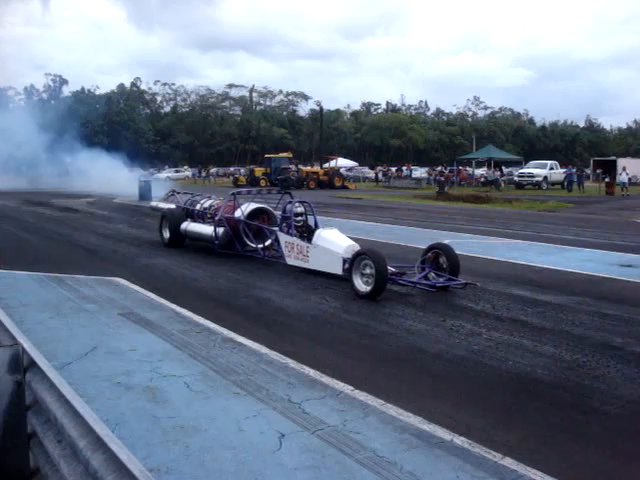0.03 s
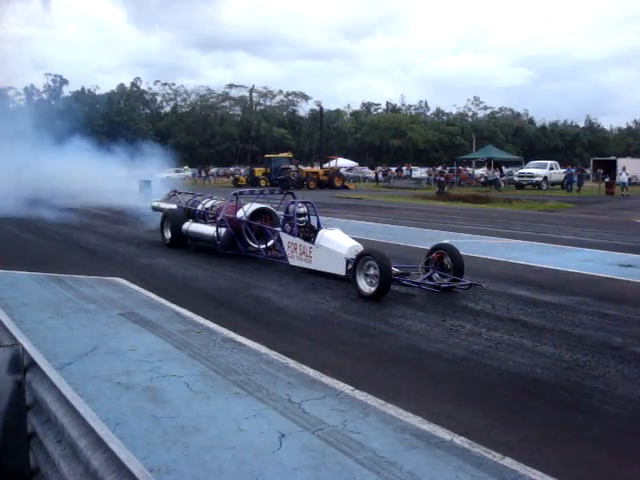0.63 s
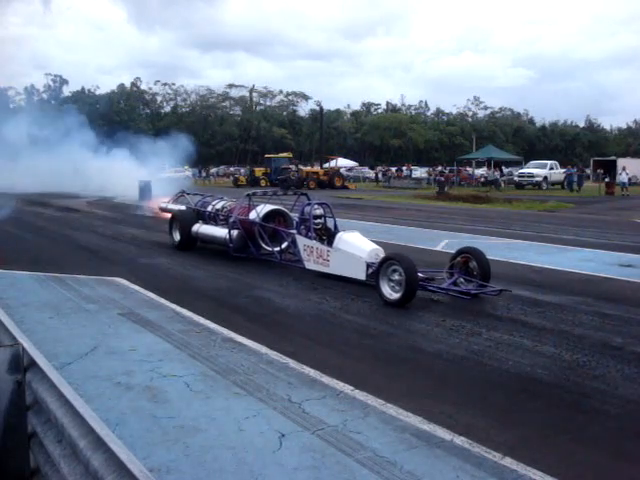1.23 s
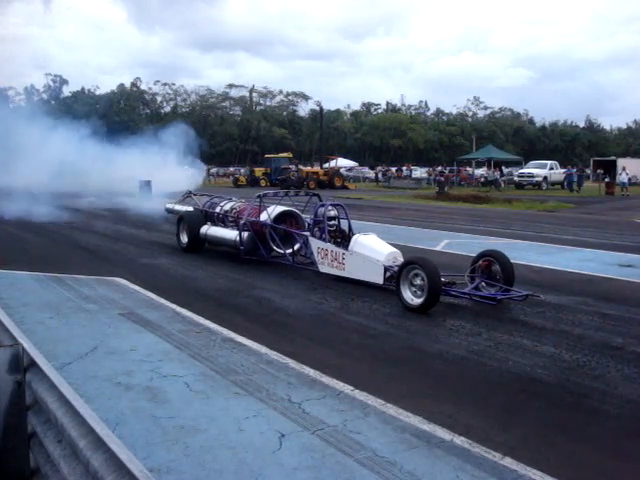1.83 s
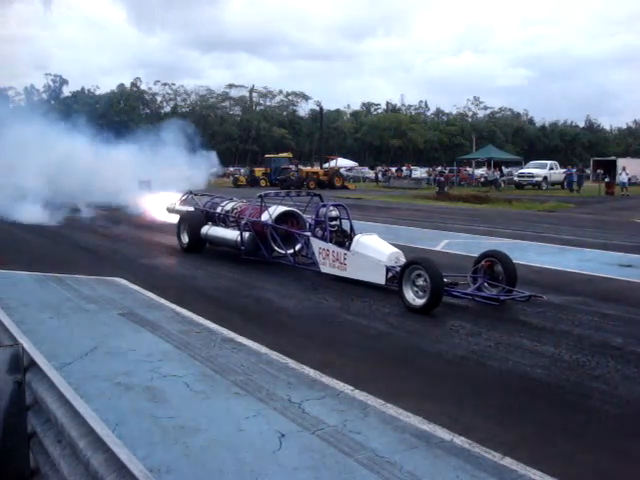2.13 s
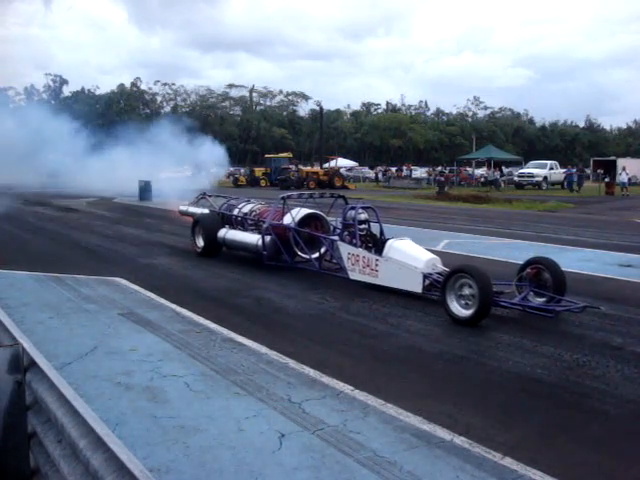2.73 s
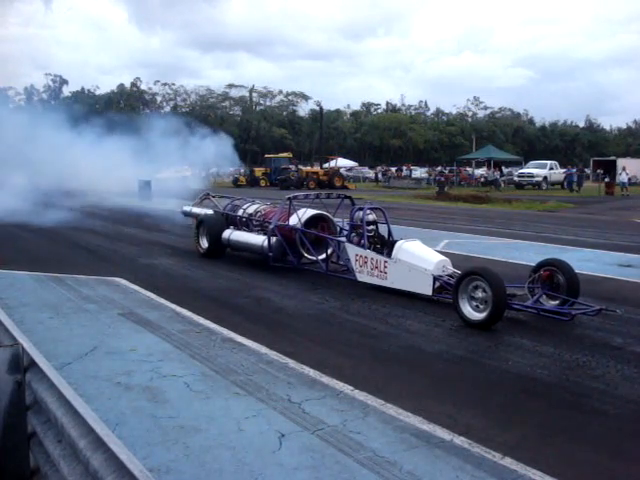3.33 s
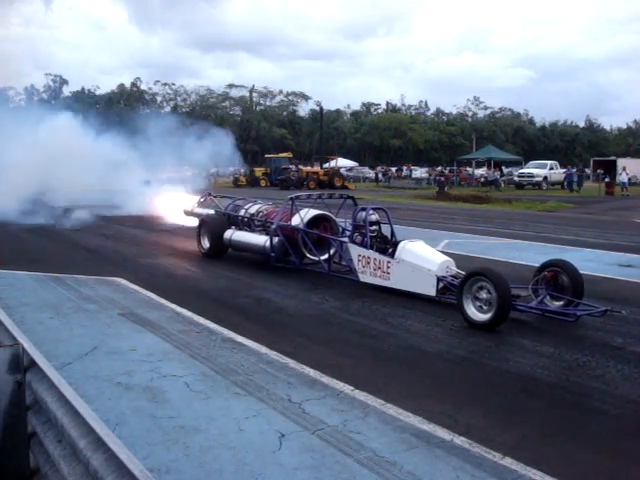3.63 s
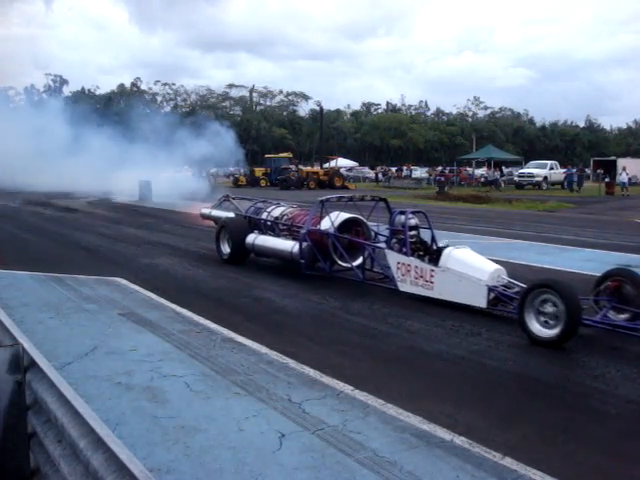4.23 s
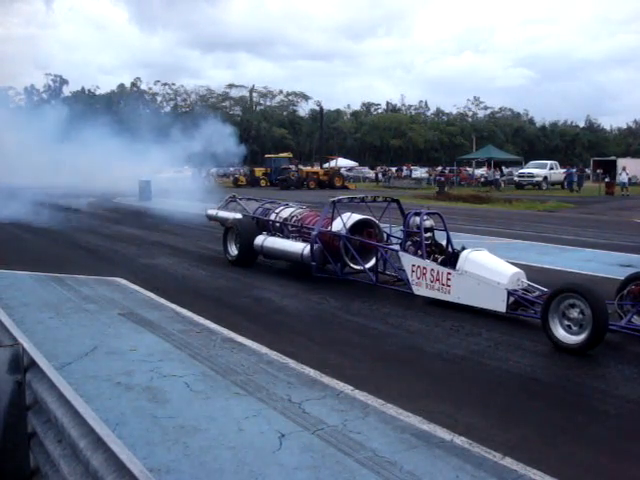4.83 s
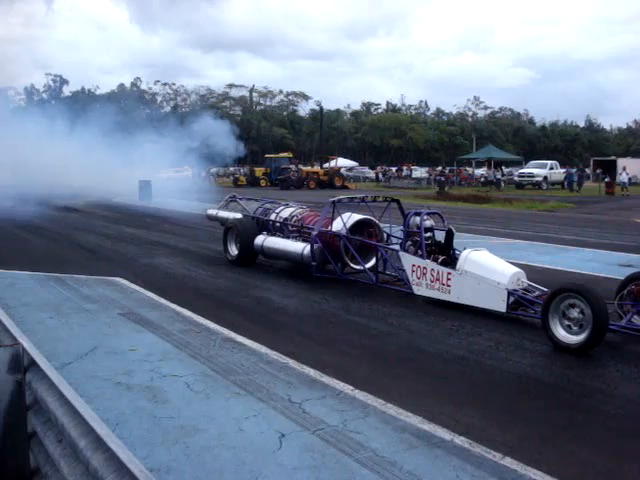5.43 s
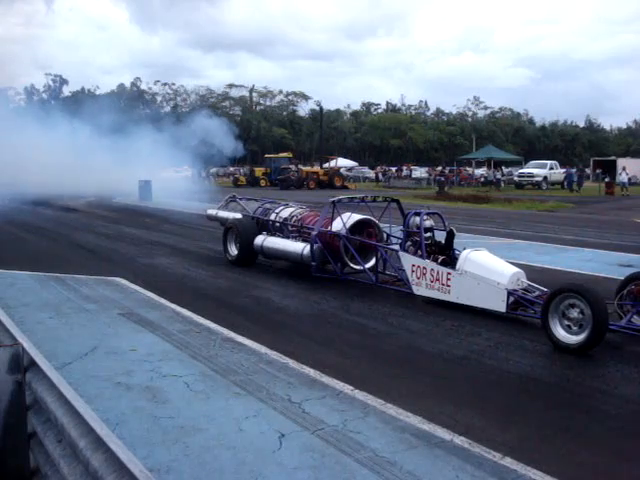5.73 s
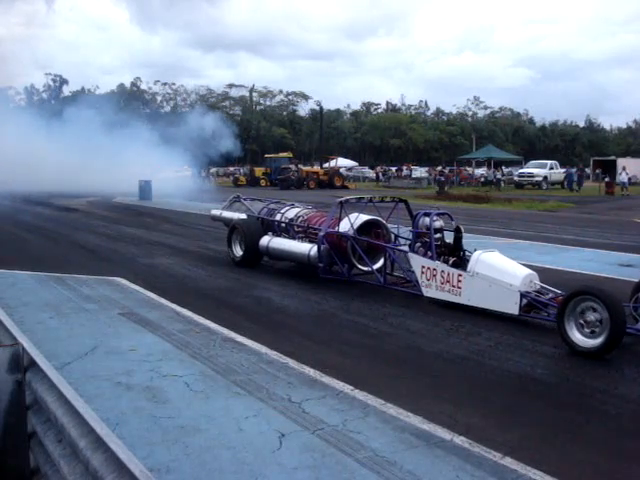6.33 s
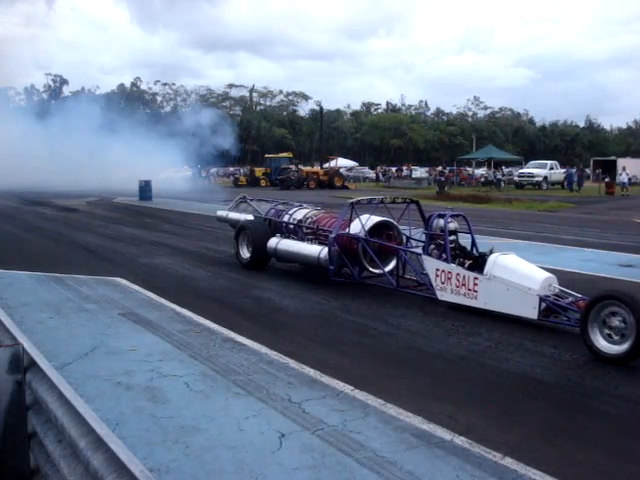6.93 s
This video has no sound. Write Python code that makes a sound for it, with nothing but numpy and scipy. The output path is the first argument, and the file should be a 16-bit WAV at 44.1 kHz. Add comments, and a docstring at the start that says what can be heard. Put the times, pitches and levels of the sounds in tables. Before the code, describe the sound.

High jet engine whine and rushing air from a dragster, dipping in pitch with three sudden, rasping flame bursts before holding steady.

```python
"""A jet dragster creeps up to the start line, heard outdoors through one microphone beside the track.
We come in on the end of a burst of flame, the compressor whining over the rush of intake and exhaust.
Three more times fuel is lit in the tailpipe: a low roar bursts out, the shaft sags, and deep in the sag
the air breaks away from the blades, turning the whine to a harsh rasp. During the last burst the intake
comes round to face the microphone. The whine steadies, then climbs from 6.4 s as the throttle opens."""
import sys
import numpy as np
from scipy import signal
from scipy.fft import rfft, irfft, next_fast_len
from scipy.io import wavfile
from scipy.ndimage import uniform_filter1d, map_coordinates

SR = 44100
rng = np.random.default_rng(int(sys.argv[2]) if len(sys.argv) > 2 else 0)


def generate_wav(signal):
    """Clip the signal to [-1, 1] and save it as 16-bit WAV at the path in sys.argv[1]."""
    frames = np.transpose(np.atleast_2d(signal))
    scaled = np.clip(frames, -1, 1) * 32767
    pcm = np.round(scaled).astype(np.int16)
    wavfile.write(sys.argv[1], SR, pcm)


N = 317079

STAGE_BLADES = (17, 20)  # blades of the two compressor stages
OVERTONE_ORDERS = (34, 37, 51)  # first stage doubled, sum of both stages, first stage tripled
SIDE_FADING, AHEAD_FADING = 0.21, 0.32  # scattered share of an overtone, beating with the direct sound
# how far the intake faces the microphone, 0 side-on to 1 head-on: time_s, share
INTAKE_FACING = [(0, 0.01), (3.7, 0.04), (4.8, 0.84), (7.19, 1)]
# the weaker shaft tones: cycles_per_turn
WEAK_ORDERS = (9, 11, 14, 19, 21, 23, 25, 31, 33, 35, 36, 38, 40, 42, 45, 49)
# each of them from beside the car and from ahead of it: side_db, ahead_db
WEAK_LEVELS = [(-44, -40), (-43.5, -48), (-48.5, -41), (-42, -48.5), (-46, -49.5), (-37, -43.5),
               (-44.5, -37), (-43.5, -47), (-48, -52.5), (-47.5, -48), (-45, -61), (-55.5, -57.5),
               (-42.5, -37), (-67, -50.5), (-56.5, -50), (-59.5, -47.5)]

def compressor_whine(flutter_db, jitter_rad, stall_jitter_rad, weak_flutter_db, weak_stall_db):
    """Blade tones locked to the shaft flutter in level and phase in moving air; weaker ones drift."""
    facing = np.clip(curves(INTAKE_FACING)[0], 0, 1)
    stalled = sum(burst(start, end, attack_s=0.04, t60_s=0.055) for start, end, *_ in BLADE_STALLS)
    wander_hz = 0.07 * wobble(3)  # the shaft is never quite steady
    angle = shaft_angle() + phase_of(wander_hz)
    overtone_fading = SIDE_FADING + facing * (AHEAD_FADING - SIDE_FADING)
    fadings = [0, 0.18] + [overtone_fading] * len(OVERTONE_ORDERS)  # the two stages come first
    tones = np.zeros(N)
    for order, db, fading in zip(STAGE_BLADES + OVERTONE_ORDERS, blade_levels(facing, stalled), fadings):
        scatter = order / STAGE_BLADES[0]  # shorter waves are scattered more
        shake = jitter_rad * wobble(45) + stall_jitter_rad * stalled * wobble(110)
        phase = order * angle + scatter * shake + rng.uniform(0, 2 * np.pi)
        gain = amp(db + flutter_db * scatter * wobble(24))
        tones += gain * (np.sin(phase) + fading * noise_band(phase, width_hz=4.5))
    for order, (side_db, ahead_db) in zip(WEAK_ORDERS, WEAK_LEVELS):
        db = side_db + facing * (ahead_db - side_db)
        db += weak_flutter_db * wobble(9) - weak_stall_db * stalled
        tones += amp(db) * np.sin(order * angle + rng.uniform(0, 2 * np.pi))
    return np.sqrt(2) * tones


# the first stage's tone as the car rolls by the microphone: time_s, level_db
FIRST_STAGE_LEVEL = [(0, -16.5), (.3, -17.5), (.55, -21.5), (.85, -23.5), (1.05, -17.5), (1.75, -21),
                     (2.13, -16.5), (2.35, -20), (3.1, -17.5), (3.9, -18), (4.6, -16.5), (5.7, -15),
                     (6.35, -17), (6.72, -18.5), (7.03, -16.5), (7.19, -23)]
# the second stage's tone: time_s, level_db
SECOND_STAGE_LEVEL = [(0, -31), (.6, -36.5), (1.7, -31.5), (2.05, -30), (3.05, -27.5), (3.2, -24),
                      (3.6, -25), (4.7, -27), (5, -37.5), (5.6, -30), (6.45, -28), (6.72, -38),
                      (6.9, -29.5)]
# the first stage's octave: time_s, level_db
OCTAVE_LEVEL = [(0, -38), (.45, -24), (.85, -29), (1.9, -24), (2.4, -23), (2.95, -33), (3.25, -24),
                (4.5, -34.5), (4.95, -30.5), (5.8, -39), (6.3, -31.5), (7.19, -32.5)]
# the sum tone and the tripled tone: side_db, ahead_db, sag_loss_db, stall_loss_db, run_up_gain_db
HIGH_TONES = [(-27, -42, 0, 24, 15), (-42.5, -36.8, -2, 14, 2.5)]

def blade_levels(facing, stalled, gain_duck_db=3.5, stage_stall_db=2.5, octave_stall_db=13):
    """Levels in dB of the five main whine tones, which all sink in a stall."""
    # the lower three duck during each loud burst, as if the recorder's automatic gain turned them down
    loud = sum(burst(start, cut, attack_s=0.012, t60_s=0.45) for start, cut, *_ in BURNS)
    duck_db = gain_duck_db * loud
    load, rising = sag(), run_up()
    stages = [curves(level)[0] - duck_db - stage_stall_db * stalled
              for level in (FIRST_STAGE_LEVEL, SECOND_STAGE_LEVEL)]
    octave = curves(OCTAVE_LEVEL)[0] - duck_db - octave_stall_db * stalled
    higher = [side_db + facing * (ahead_db - side_db)
              - sag_db * load - stall_db * stalled + run_up_db * rising
              for side_db, ahead_db, sag_db, stall_db, run_up_db in HIGH_TONES]
    return stages + [octave] + higher


CRUISE_HZ, SAG_HZ, SPOOL_UP_S = 186.5, 7.47, 0.44  # shaft speed, drop under a flame, recovery after it
SAG_SKEW, SAG_ROUNDING = 0.64, 1.64  # a sag falls fast and climbs back slowly
RUN_UP_S, RUN_UP_HZ_PER_S2 = 6.417, 7.6

def shaft_speed():
    """Turns a second: every flame drags the shaft down in the same arch; at the end the throttle opens."""
    t = clock()
    hz = CRUISE_HZ + RUN_UP_HZ_PER_S2 * np.maximum(t - RUN_UP_S, 0) ** 2
    for start, cut, *_ in BURNS:
        progress = np.clip((t - start) / (cut + SPOOL_UP_S - start), 0, 1)
        hz -= SAG_HZ * np.abs(np.sin(np.pi * progress ** SAG_SKEW)) ** SAG_ROUNDING
    return hz


def shaft_angle():
    """How far the rotor has turned, in radians."""
    return phase_of(shaft_speed())


def sag():
    """How far the shaft is dragged down: 0 at cruise, 1 at the bottom."""
    return np.maximum(CRUISE_HZ - shaft_speed(), 0) / SAG_HZ


def run_up(full_swell_hz=2.66):
    """The closing swell: 0 at cruise, 1 once the shaft has gained full_swell_hz."""
    return np.clip((shaft_speed() - CRUISE_HZ) / full_swell_hz, 0, 1) ** 2


ROAR_HOLD_S, DEEP_HOLD_S = 0.24, 0.18  # a flame keeps its full size this long
FIREBALL_DB, PIPE_RING_DB = -12.5, 2.5  # fireball against the roar, pipe ring against the hum
HUM_HZ, HUM_COLD_DROP_HZ, PIPE_WARM_S = 156.3, 17, 0.14  # the pipe sings flat until the gas is hot
# fuel burning in the tailpipe: start_s, fuel_cut_s, roar_db, hum_db, thump_db
BURNS = [(-.5, 0.108, -24.8, -40.5, -47), (0.887, 1.5, -24.5, -40.5, -47),
         (2.181, 2.853, -25.5, -40.5, -44.5), (3.651, 4.361, -25, -43, -47)]
# spectrum of the flame's roar: frequency_hz, relative_db
ROAR_SPECTRUM = [(40, -40), (100, -32), (200, -16.5), (330, -3), (500, 2.5), (750, 1), (1100, -1),
                 (1800, -7.5), (3000, -7.5), (8000, -18.5)]
# spectrum of the deep fireball: frequency_hz, relative_db
FIREBALL_SPECTRUM = [(30, -23.5), (95, -23.5), (140, -8), (220, 1), (330, 2), (600, -6), (2000, -31)]
# spectrum of the ignition thump: frequency_hz, relative_db
THUMP_SPECTRUM = [(25, -20), (90, -3), (220, 4), (600, -14), (2000, -40)]
# higher resonances of the tailpipe: pitch_hz, width_hz, relative_db
PIPE_MODES = [(244, 11, -5), (299, 16, 2.5)]

def tailpipe_flames(roar_fade_db_per_s, deep_fade_db_per_s, hum_fade_db_per_s):
    """Fuel catches with a thump and sets the pipe humming; the shrinking flame's deep part fades first."""
    roar, fireball, ring, hum, thump = np.zeros((5, N))
    for start, cut, roar_db, hum_db, thump_db in BURNS:
        age = np.maximum(clock() - start, 0)
        burning = burst(start, cut, attack_s=0.0047, t60_s=1.0)
        deep = burning * amp(-deep_fade_db_per_s * np.maximum(age - DEEP_HOLD_S, 0))
        roar += burning * amp(roar_db - roar_fade_db_per_s * np.maximum(age - ROAR_HOLD_S, 0))
        fireball += deep * amp(roar_db + FIREBALL_DB)
        singing = deep * amp(hum_db - hum_fade_db_per_s * age)
        ring += singing * amp(PIPE_RING_DB)
        pitch_hz = HUM_HZ - HUM_COLD_DROP_HZ * np.exp(-age / PIPE_WARM_S) + 3.5 * wobble(22)
        hum += singing * amp(1.6 * wobble(20)) * np.sin(phase_of(pitch_hz))
        thump += amp(thump_db) * burst(start - 0.006, start + 0.014, attack_s=0.004, t60_s=0.2)
    pipe = lambda f: sum(amp(db) / (1 + ((f - hz) / width) ** 2) for hz, width, db in PIPE_MODES)
    # fill each envelope with its own noise
    roar *= amp(0.8 * wobble(30)) * turbulence(ROAR_SPECTRUM, patchy_db=0.75)
    fireball *= turbulence(FIREBALL_SPECTRUM, patchy_db=1.5)
    ring *= unit(filtered(rng.standard_normal(N), pipe))
    thump *= turbulence(THUMP_SPECTRUM, patchy_db=3.0)
    return roar + fireball + hum + ring + thump


# air breaking away from the blades: start_s, end_s, final_rasp_db, shriek_db, howl_hz, howl_db
BLADE_STALLS = [(-.3, 0.15, -21.5, -29, 2040, -35), (1.103, 1.573, -21, -27, 1750, -36),
                (2.385, 2.884, -19.5, -28.5, 1898, -32), (3.85, 4.435, -20.5, -29, 1636, -30)]
# blade tones smeared by stalled air: cycles_per_turn, width_hz, relative_db
SHRIEK_BANDS = [(16.52, 30, -4), (17.04, 43, -3.5), (33.8, 81, 0.5), (37.2, 45, -4.5)]
# spectrum of the rasp: frequency_hz, relative_db
RASP_SPECTRUM = [(50, -42), (350, -19.5), (600, -7.5), (1150, -6), (1700, -1.5), (2300, -7.5), (2800, -1.5),
                 (3050, -2.5), (3400, 1.5), (4300, -2.5), (5500, -8), (6080, -4), (6900, -11),
                 (9500, -15.5)]

def compressor_stalls(rasp_growth_db):
    """Separated flow shrieks with the shaft, howls, and rasps ever harder until the air grips again."""
    angle = shaft_angle()
    shriek = sum(amp(db) * noise_band(order * angle, width) for order, width, db in SHRIEK_BANDS)
    rasp_gain, shriek_gain, howl = np.zeros((3, N))
    for start, end, rasp_db, shriek_db, howl_hz, howl_db in BLADE_STALLS:
        progress = np.clip((clock() - start) / (end - start), 0, 1)
        stalled = burst(start, end, attack_s=0.02, t60_s=0.15)
        rasp_gain += stalled * amp(rasp_db + rasp_growth_db * (progress - 1))
        shriek_gain += stalled * amp(shriek_db)
        howl_gain = amp(howl_db) * burst(start, end, attack_s=0.12, t60_s=1.0)
        howl += howl_gain * noise_band(2 * np.pi * howl_hz * clock(), width_hz=130)
    rasp = amp(1.4 * wobble(70)) * turbulence(RASP_SPECTRUM, patchy_db=2.0)
    return rasp_gain * rasp + shriek_gain * shriek + howl


# intake hiss at the microphone: cruise_db, sag_gain_db, ahead_gain_db, run_up_gain_db
HISS_LEVEL = (-22.5, 1.5, 0.8, -0.5)
# exhaust rush at the microphone: cruise_db, sag_gain_db, ahead_gain_db, run_up_gain_db
RUSH_LEVEL = (-27.5, 3.5, 0.5, 1.3)
# spectrum of the intake: frequency_hz, relative_db
INTAKE_SPECTRUM = [(100, -57), (600, -29), (1500, -13.5), (2500, -6), (2900, -2.5), (3170, 0.5),
                   (3450, -0.5), (4200, -5), (5500, -4), (6400, -1.5), (7300, -5), (8500, -8), (9700, -7)]
# spectrum of the exhaust: frequency_hz, relative_db
EXHAUST_SPECTRUM = [(25, -41), (60, -31.5), (110, -26.5), (200, -16.5), (330, -13), (600, -7), (1200, -4.5),
                    (1750, -1.5), (2400, 0), (4000, -6), (9000, -25)]

def intake_and_exhaust(duct_hz):
    """Intake hiss and darker exhaust swell under load; from ahead the intake duct adds a hollow note."""
    facing, load, rising = curves(INTAKE_FACING)[0], sag(), run_up()
    intake_db, exhaust_db = (db + sag_db * load + ahead_db * facing + run_up_db * rising
                             for db, sag_db, ahead_db, run_up_db in (HISS_LEVEL, RUSH_LEVEL))
    intake_db += 0.41 * wobble(6.5) + 0.3 * wobble(40)
    intake = amp(intake_db) * turbulence(INTAKE_SPECTRUM, patchy_db=0.85)
    exhaust = amp(exhaust_db + 0.8 * wobble(6.8)) * turbulence(EXHAUST_SPECTRUM, patchy_db=0.3)
    duct = amp(-47) * facing * noise_band(2 * np.pi * duct_hz * clock(), width_hz=75)
    return intake + exhaust + duct


# the bounce off the track lags more as the car nears the microphone: time_s, lag_s
BOUNCE_LAG = [(0, 0.0017), (2.1, 0.0017), (2.25, 0.0015), (2.7, 0.00154), (3.6, 0.0021), (4.2, 0.0023),
              (5, 0.0024), (7.19, 0.0024)]

def track_bounce(direct, cutoff_hz=2600):
    """The dull, late reflection from the asphalt, which combs the roar at the microphone."""
    dull = filtered(direct, lambda f: 1 / (1 + (f / cutoff_hz) ** 4))
    return map_coordinates(dull, [(clock() - curves(BOUNCE_LAG)[0]) * SR])


def turbulence(spectrum, patchy_db):
    """Coloured noise of rms 1 in which eddies lift and sink patches of the spectrum."""
    cells = signal.stft(rng.standard_normal(N), nperseg=512)[2]
    eddies = uniform_filter1d(rng.standard_normal(cells.shape), 6, axis=0)
    eddies = uniform_filter1d(eddies, 16, axis=1)
    air = signal.istft(cells * amp(patchy_db * unit(eddies)), nperseg=512)[1][:N]
    hz, db = np.transpose(spectrum)
    return unit(filtered(air, lambda f: amp(np.interp(np.log(f + 1), np.log(hz), db))))


def noise_band(phase, width_hz):
    """A narrow band of noise around a tone of the given phase."""
    return wobble(2 * width_hz) * np.sin(phase) + wobble(2 * width_hz) * np.cos(phase)


def burst(start, end, attack_s, t60_s):
    """An envelope that rises at start, holds, and dies away after end."""
    t = clock()
    rise = 1 - np.exp(-np.maximum(t - start, 0) / attack_s)
    return rise * amp(-60 * np.maximum(t - end, 0) / t60_s)


def wobble(rate):
    """A smooth random curve, rate knots a second."""
    return map_coordinates(rng.standard_normal(int(N * rate / SR) + 4), [clock() * rate])


def filtered(x, response):
    """x shaped by a gain that depends on frequency."""
    size = next_fast_len(N + 8192)
    return irfft(rfft(x, size) * response(np.fft.rfftfreq(size, 1 / SR)), size)[:N]


def curves(rows):
    """One value per sample for each column after the time."""
    times, *columns = np.transpose(rows)
    return [np.interp(clock(), times, column) for column in columns]


def phase_of(hz):
    """Running phase of a changing frequency, in radians."""
    return 2 * np.pi * np.cumsum(hz) / SR


def clock():
    """The time of every sample."""
    return np.arange(N) / SR


def amp(db):
    """Decibels to gain."""
    return 10 ** (np.asarray(db) / 20)


def unit(x):
    """Scale to rms 1."""
    return x / np.sqrt(np.mean(x ** 2) + 1e-20)


def scene():
    """The whole engine from the trackside, one microphone on both channels."""
    roar = intake_and_exhaust(duct_hz=1710)
    roar += tailpipe_flames(roar_fade_db_per_s=18.5, deep_fade_db_per_s=14.5, hum_fade_db_per_s=11.5)
    roar += compressor_stalls(rasp_growth_db=3.0)
    whine = compressor_whine(flutter_db=0.52, jitter_rad=0.081, stall_jitter_rad=0.66,
                             weak_flutter_db=2, weak_stall_db=10)
    engine = whine + roar + 0.18 * track_bounce(roar)
    return np.array([engine, engine])


TOP_HZ, EDGE_WIDTH_HZ = 10120, 150

def record(dry):
    """The recorder keeps nothing above its band limit."""
    passband = lambda f: np.clip((TOP_HZ - f) / EDGE_WIDTH_HZ + 0.5, 0, 1)
    return np.array([filtered(channel, passband) for channel in dry])


dry = scene()
out = record(dry)
generate_wav(out)
```